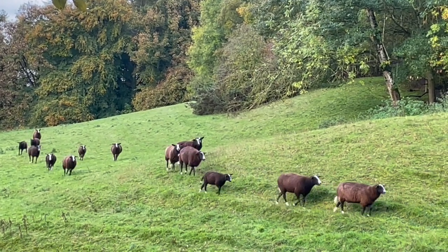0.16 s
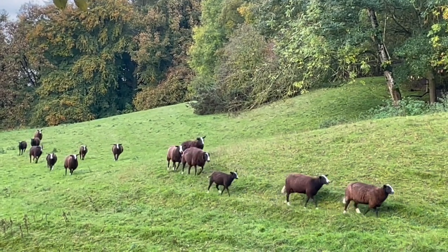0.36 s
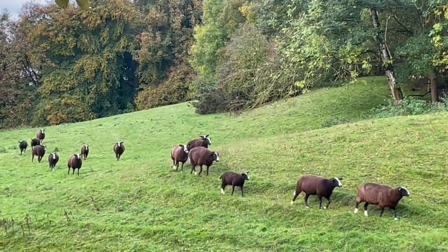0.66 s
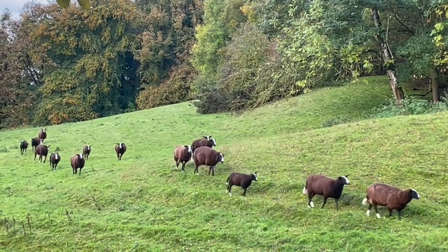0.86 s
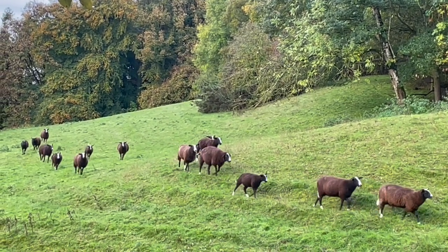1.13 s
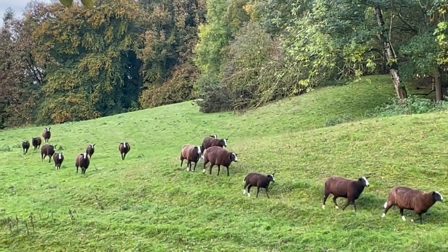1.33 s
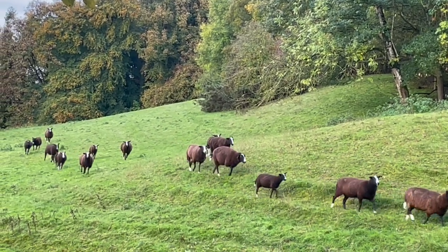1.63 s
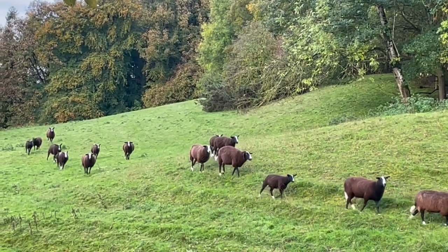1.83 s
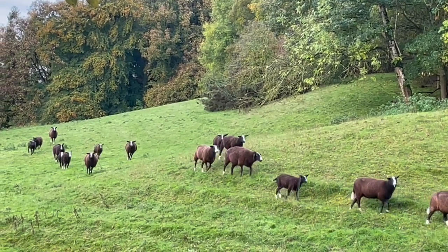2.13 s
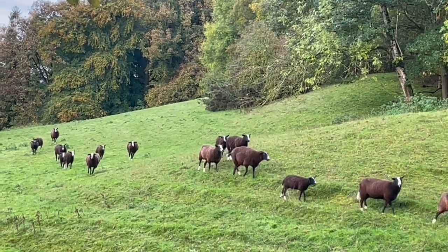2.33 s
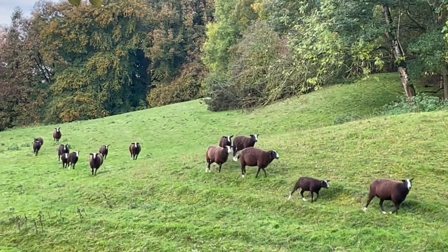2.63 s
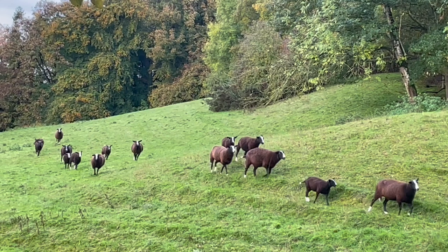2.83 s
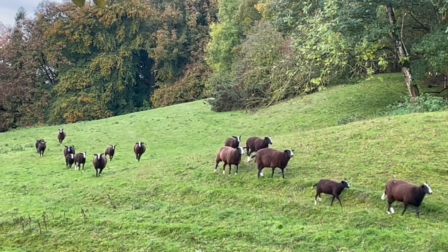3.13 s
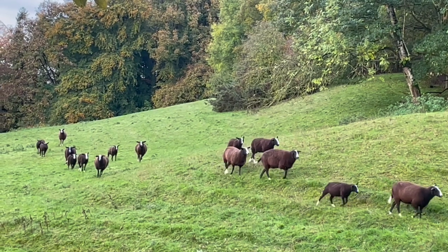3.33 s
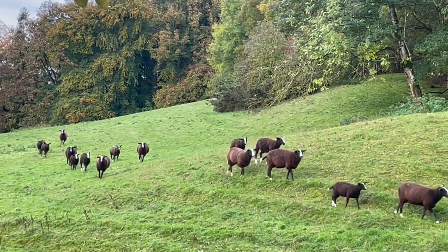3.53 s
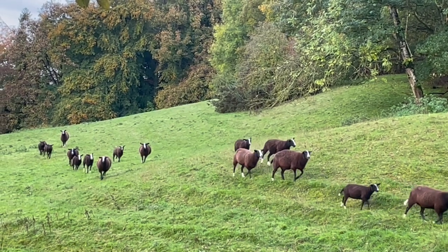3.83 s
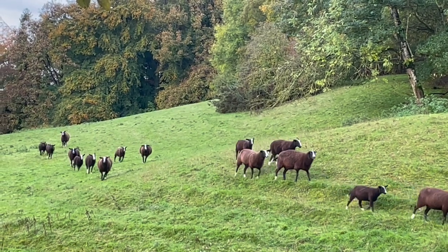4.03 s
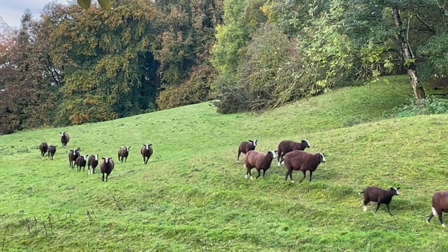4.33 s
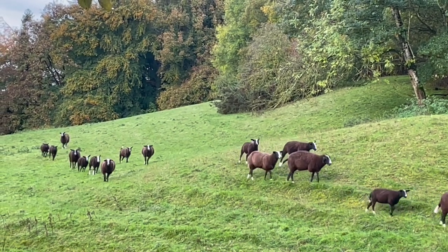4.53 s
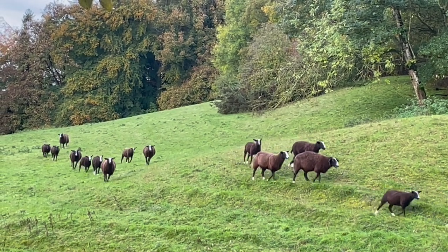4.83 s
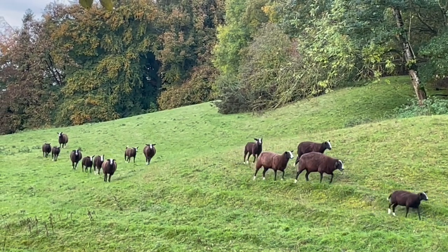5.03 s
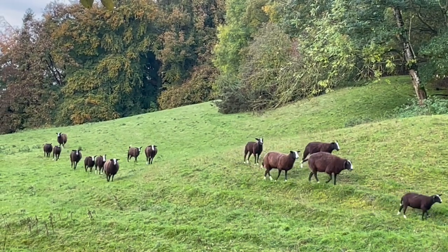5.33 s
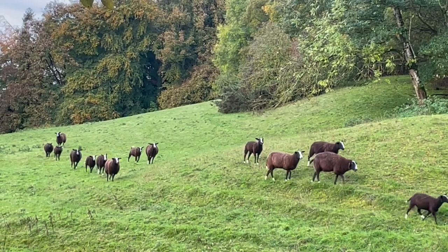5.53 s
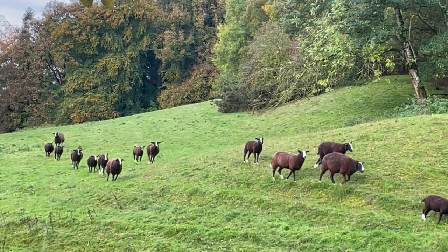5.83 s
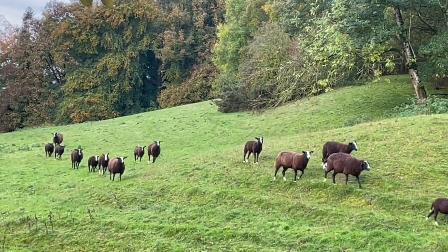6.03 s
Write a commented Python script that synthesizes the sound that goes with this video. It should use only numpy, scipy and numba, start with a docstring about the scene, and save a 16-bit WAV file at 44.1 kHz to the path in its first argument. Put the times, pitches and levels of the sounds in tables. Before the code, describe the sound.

A phone in an open field picks up a flock of sheep with short echoes from ground and trees. After a brief tail of a bleat and weak rough calls, mostly ticks and dull taps fill a gap. Then bleats crowd together: clear, growling, brassy, harsh, low and rising, finishing with a strong trembling one cut off at the end. Low hum, deep rumble and gentle field hiss stay underneath.

```python
"""Sheep bleat one over another on a grass slope, tens of metres from a phone: clean, throbbing, two croaking.
Each voice is a train of vocal-fold slaps and breath that rings in throat resonances, with ground and tree echoes.
Drops tick and tap close by, each a snap and a dying burst of band-passed noise, over a faint patter.
Under all lie a wavering low hum with deep rumble and a soft, flickering field hiss, both shaped noise or tone."""
import sys
import numpy as np
from scipy import signal
from scipy.fft import rfft, irfft, next_fast_len
from scipy.io import wavfile
from scipy.ndimage import uniform_filter1d
from numba import njit

SR = 44100
rng = np.random.default_rng(int(sys.argv[2]) if len(sys.argv) > 2 else 0)


def dump_mix(stems):
    """Bounce the given channels to the path in sys.argv[1] as a 16-bit WAV at rate SR."""
    frames = np.atleast_2d(stems).T  # one column per channel
    limited = np.clip(frames, -1, 1)  # hard clip at full scale
    pcm = np.round(limited * 32767).astype(np.int16)
    wavfile.write(sys.argv[1], SR, pcm)


N = 272097


def undb(db):
    """Amplitude ratio of a level in dB."""
    return 10 ** (np.asarray(db) / 20)


def unit(x):
    """Scale to rms 1."""
    return x / np.sqrt(np.mean(x ** 2))


def on_log(hz, table):
    """Read (Hz, value) rows on a log-frequency axis."""
    at, value = np.transpose(table)
    return np.interp(np.log(np.maximum(hz, 1)), np.log(at), value)


def rows_of(curve, table):
    """The rows of a table that belong to one bleat, without the bleat itself."""
    return [row[1:] for row in table if row[0] is curve]


@njit
def svf(x, hz, width):
    """State-variable band-pass with a moving centre, gain 1 there."""
    y, band, low = np.empty(len(x)), 0., 0.
    for i in range(len(x)):
        g, k = np.tan(np.pi * hz[i] / SR), width / hz[i]
        v = (band + g * (x[i] - low)) / (1 + g * (g + k))
        band, low, y[i] = 2 * v - band, low + 2 * g * v, k * v
    return y


def walk(rate):
    """Random levels held 1 / rate s and smoothed twice over that time; spread near 1."""
    hold = int(SR / rate)
    steps = np.repeat(rng.standard_normal(N // hold + 1), hold)
    return 1.284 * uniform_filter1d(uniform_filter1d(steps, hold), hold)[:N]


# pitch and level through each single bleat: time_s, pitch_hz, level_db
TAIL = [(0, 98.9, -29), (.04, 98.4, -37.5), (.075, 95.5, -42), (.12, 91, -77)]
HOARSE = [(0.12, 129.5, -56), (0.176, 137.6, -45.5), (0.254, 126.9, -44.5), (0.494, 125.4, -44.5),
          (0.62, 122.4, -61)]
CROAK = [(0.33, 62.2, -54), (.37, 61.8, -43), (.42, 59.6, -49), (0.5, 53.9, -44), (.56, 45.8, -48.5),
         (0.62, 40.3, -41)]
FAINT = [(0.44, 179.4, -50.5), (0.6, 194.5, -54), (0.72, 191.4, -54), (0.85, 186, -56), (0.93, 172, -72)]
CLEAR = [(2.24, 197.3, -50), (2.276, 200.1, -50.5), (2.31, 213.6, -43), (2.354, 229.9, -35.5),
         (2.4, 241.8, -36.5), (2.47, 242.5, -38), (2.552, 244.4, -36.5), (2.68, 239.2, -40.5),
         (2.8, 241.4, -42.5), (2.88, 242, -45.5), (2.944, 233.8, -39.5), (2.988, 205, -46.5),
         (3.03, 185, -95)]
GROWL = [(2.26, 46.94, -48.5), (2.322, 46, -37.5), (2.908, 46.34, -36), (2.98, 45.3, -74)]
MURMUR = [(3.04, 174, -63), (3.1, 179.3, -55), (3.2, 187, -50), (3.25, 195, -50.5), (3.3, 205, -49)]
LAMB = [(3.76, 186, -47), (3.86, 172, -62), (3.92, 181.3, -52), (3.994, 199.3, -42), (4.05, 191.6, -50.5),
        (4.1, 185, -82)]
LOW = [(4.74, 115.9, -39), (4.8, 118.5, -34.5), (4.938, 119.6, -33), (5.024, 117.4, -34),
       (5.06, 115, -36.5), (5.228, 111.8, -36.5), (5.336, 110.7, -40), (5.372, 115.4, -35),
       (5.385, 112.8, -91)]
SOFT = [(4.74, 196, -66), (4.76, 197, -47.5), (5.32, 186, -52.5), (5.48, 169, -58.5)]
RISING = [(5.05, 188.5, -46), (5.108, 196.2, -41.5), (5.186, 218.4, -39), (5.23, 223.1, -39.5),
          (5.36, 226.6, -41.5), (5.496, 229, -42), (5.538, 239.2, -43.5), (5.568, 277.6, -54),
          (5.674, 267.3, -49.5), (5.738, 267.6, -60), (5.75, 261.7, -67)]
NEAR = [(5.705, 130.4, -50), (5.722, 137, -35.5), (5.752, 144.7, -28.5), (5.835, 153.1, -29.5),
        (5.96, 153.4, -28.5), (6.06, 154.6, -27), (6.17, 150, -31)]
# bleats with their own treble balance: time_s, pitch_hz, level_db (lower resonances), upper_over_lower_db
DEEP = [(3.235, 119.9, -50, 6), (3.263, 119.4, -43, 11), (3.285, 128, -40, -2), (3.313, 122.5, -42, -1.5),
        (3.347, 133.4, -38, 0), (3.387, 137.4, -34.5, -0.5), (3.433, 145.1, -35.5, 3),
        (3.473, 140.1, -36.5, 1), (3.623, 133.8, -39, 0), (3.647, 128.1, -41.5, -1),
        (3.673, 130.4, -42.5, 4), (3.699, 122.9, -44.5, 0.5), (3.735, 125.2, -63, 14), (3.747, 125, -60, 6),
        (3.77, 122.5, -51, 16)]
LOUD = [(4.268, 169.8, -68, -2), (4.276, 172, -56, 10), (4.3, 177.1, -56, 5.5), (4.342, 179, -89, 6),
        (4.37, 170.6, -40.5, 1.5), (4.396, 167.6, -35.5, 5), (4.424, 175.4, -52, 6),
        (4.454, 161.8, -42.5, -0.5), (4.478, 173, -32.5, 5), (4.502, 165.8, -39, 8), (4.51, 164.7, -40, 4),
        (4.534, 186.4, -35.5, 3), (4.548, 184.8, -32, 0.5), (4.576, 187.1, -34.5, 5),
        (4.606, 202.8, -33.5, 2.5), (4.652, 208.1, -32.5, -3), (4.674, 205, -34, 0), (4.702, 189.8, -35, 1),
        (4.716, 194.7, -39, 5.5), (4.742, 186.0, -31.5, 1.5), (4.764, 200.2, -35.5, 1.5),
        (4.784, 201, -42, 3), (4.802, 206.5, -31, -4.5), (4.826, 197.4, -39.5, 7), (4.842, 193, -35.5, -9),
        (4.87, 180, -42, -14)]
# stretches where a voice turns ragged: bleat, from_s, to_s, added_jitter (share of a period),
# loss_db (above TOP_THROAT_HZ)
RAGGED = [(LOUD, 4.26, 4.52, .022, 3), (LOUD, 4.52, 4.61, .004, 0), (LOUD, 4.61, 4.69, 0, 6),
          (LOUD, 4.69, 4.87, .02, 1), (DEEP, 3.2, 3.34, .03, 13), (DEEP, 3.64, 3.8, .012, 2),
          (CLEAR, 2.2, 2.31, .01, 3)]
# side pockets of the throat swallow a band: bleat, centre_hz, width_hz
HOLLOWS = [(LOUD, 4050, 800), (GROWL, 3500, 1200)]
CATCH_SAG, CATCH_JITTER = .006, .297  # per dB of catch: fall of pitch as a share, growth of jitter
CATCH_EDGE = .34  # flare at both edges of a catch, dB per dB, before the treble weighting
UPPER_HOLD = .17  # share of a fall in level that the upper resonances do not follow


def bleat(curve, catches, jitter, scatter_db, breath_db, treble_share, facing, throat, jaw):
    """Vocal folds slap shut once a cycle, air puffs follow, the throat rings; returns start and sound."""
    s, *columns = np.transpose(curve)
    start = int(max(s[0], 0) * SR)
    t = np.arange(start, min(int(s[-1] * SR), N)) / SR
    hz, db, *bright_db = (np.interp(t, s, column) for column in columns)
    upper_db = bright_db[0] if bright_db else UPPER_HOLD * (db.max() - db)

    catch_db, flare_db = np.zeros((2, len(t)))
    for at_s, depth_db, length_s in catches:
        shut = np.exp(-np.log(2) * ((t - at_s) / (length_s / 2)) ** 4)
        catch_db += depth_db * shut
        flare_db += CATCH_EDGE * depth_db * 4 * shut * (1 - shut)
    more_jitter, loss_db = np.zeros((2, len(t)))
    for a, b, more, loss in rows_of(curve, RAGGED):
        inside = np.interp(t, (a - .01, a, b, b + .01), (0, 1, 1, 0))
        more_jitter += more * inside
        loss_db += loss * inside

    # a catch slows the folds and makes them uneven
    cycles = np.cumsum(hz * (1 - CATCH_SAG * catch_db)) / SR
    whole = np.arange(1, int(cycles[-1]))
    smooth_catch_db = uniform_filter1d(catch_db, size=1500)
    uneven = jitter * (1.5 + CATCH_JITTER * np.interp(whole, cycles, smooth_catch_db))
    uneven = uneven + np.interp(whole, cycles, more_jitter)
    sources = folds(curve, cycles, whole, uneven, scatter_db, breath_db)

    jaw_percent = np.interp(t, np.linspace(s[0], s[-1], 3), jaw)
    caught, steady = ring_throat(curve, t, hz, sources, throat, jaw_percent, catch_db, flare_db, loss_db,
                                 treble_share, facing)
    # lower and upper resonances are levelled apart only where the bleat gives both levels
    norms = steady.std(1) if bright_db else 2 * [np.std(steady[0] + undb(upper_db) * steady[1])]
    voice = caught[0] / norms[0] + undb(upper_db) * caught[1] / max(norms[1], 1e-9)
    for dip_hz, width in rows_of(curve, HOLLOWS):
        voice = voice - svf(voice, np.full(len(t), float(dip_hz)), float(width))

    # fade both ends over 12 ms, except where the scene itself begins or ends
    since_start = t - s[0] + (start == 0)
    until_end = s[-1] - t + (s[-1] > (N - 400) / SR)
    edge = np.clip(np.minimum(since_start, until_end) / .012, 0, 1)
    return start, voice * undb(db) * edge


# folds that close in two steps: bleat, lead (samples), early_share (of the main slap)
EARLY_SLAP = [(DEEP, 62, .5), (GROWL, 430, .6)]
LOUDEST_SLAP = 1.1  # cap on the scatter, in spreads


def folds(curve, cycles, whole, uneven, scatter_db, breath_db):
    """Slaps of the vocal folds plus breath after each one, as heard by the lower and the upper throat."""
    size = len(cycles)
    chance = rng.standard_normal((400, 2))[:len(whole)].T
    at = np.interp(whole + np.clip(uneven * chance[0], -.4, .4), cycles, np.arange(size - 0.))
    # a windowed sinc places each slap between samples
    taps = np.arange(-7, 9)[:, None]
    part = taps - at % 1
    kernel = np.sinc(part) * np.cos(np.pi * part / 17) ** 2
    # the puff is stronger in the treble, so the low harmonics stay clean
    puff = np.exp(-(cycles % 1) / .3) * signal.lfilter([1, -.7], 1, rng.standard_normal(size))
    sources = []
    for share in (.3, 1):  # low resonances feel little of the change from slap to slap
        slaps = np.zeros(size + 16)
        slap_db = share * scatter_db * np.minimum(chance[1], LOUDEST_SLAP)
        np.add.at(slaps, at.astype(int) + taps + 7, kernel * undb(slap_db))
        for lead, early in rows_of(curve, EARLY_SLAP):
            slaps[:-lead] += early * slaps[lead:]
        sources.append(unit(slaps[7:7 + size]) + undb(breath_db) * unit(puff))
    return sources


# the mouth opens as the pitch climbs and lifts the lower resonances: bleat, climb_share (exponent on pitch)
WIDE_MOUTH = [(LOUD, 0.36)]
# one resonance swells or fades as the tongue moves: bleat, time_s, half_length_s, resonance_hz, change_db
SWELLS = [(CLEAR, 2.37, .03, 1900, 10), (CLEAR, 2.36, .03, 3160, 6), (CLEAR, 2.6, .03, 3160, 6),
          (CLEAR, 2.68, .03, 3780, 7), (CLEAR, 2.85, .1, 2780, -4), (LOUD, 4.575, .045, 2950, 4),
          (LOUD, 4.65, .03, 2950, -9), (LOUD, 4.73, .035, 5650, 8), (LOUD, 4.52, .04, 5150, 4),
          (LOUD, 4.59, .05, 2476, 2), (HOARSE, .25, .08, 2080, 3), (LOW, 4.82, .02, 580, 3),
          (LOW, 5.15, .12, 1547, -6), (LOW, 5.1, .2, 2616, -5), (RISING, 5.3, .15, 5030, 4),
          (DEEP, 3.44, .04, 544, 3), (NEAR, 5.728, .02, 4140, 7)]
UPPER_HZ, TOP_THROAT_HZ = 1800, 3200  # upper resonances lie above the first, ragged loss above the second
CATCH_JAW = .54  # rise of the resonances in percent per dB of catch
CATCH_SPAN_HZ = 1300, 3300  # between these the dip shrinks to its treble share
STRIKE_WIDER = 4.37  # a slap reaches each resonance through a wider band, so the ring starts at once
SKIRT_WIDER = 6  # a second, wider band trims the skirts of the upper resonances
WANDER_DB, WANDER_S = 1.1, .045  # each upper resonance swells and fades on its own with tongue and lips


def ring_throat(curve, t, hz, sources, throat, jaw_percent, catch_db, flare_db, loss_db, treble_share, facing):
    """Moving resonances ring at each slap; returns lower and upper sums with the catches and without."""
    caught, steady = np.zeros((2, 2, len(t)))
    shift = 1 + (jaw_percent + CATCH_JAW * catch_db) / 100
    lift = (hz / hz.mean()) ** sum(share for share, in rows_of(curve, WIDE_MOUTH))
    # facing the phone, all bands build up to the same instant and each slap is one sharp upward spike
    way = -1 if facing else 1
    for centre_hz, width, mode_db in throat:
        upper = int(centre_hz > UPPER_HZ)
        centre = centre_hz * shift * (1 if upper else lift)
        knots = np.arange(t[0], t[-1] + WANDER_S, WANDER_S)
        ring_db = upper * WANDER_DB * np.interp(t, knots, rng.standard_normal(64)[:len(knots)])
        for at_s, half_s, near_hz, change_db in rows_of(curve, SWELLS):
            if abs(near_hz / centre_hz - 1) < .07:
                ring_db = ring_db + change_db * np.exp(-((t - at_s) / half_s) ** 2)
        ring_db = mode_db + ring_db - (centre_hz > TOP_THROAT_HZ) * loss_db

        # way = -1 filters backwards in time
        strike = svf(sources[upper][::way].copy(), centre[::way].copy(), STRIKE_WIDER * width)
        strike = -way * strike[::way]
        if upper:  # valleys between the upper resonances stay dark
            strike = svf(strike.copy(), centre, SKIRT_WIDER * width)
        ring = undb(ring_db) * svf(strike.copy(), centre, float(width))
        steady[upper] += ring
        high = np.interp(centre_hz, CATCH_SPAN_HZ, (0, 1))
        caught[upper] += ring * undb((1 - treble_share) * high * (catch_db + high * flare_db) - catch_db)
    return caught, steady


# catches of the throat inside throbbing bleats: time_s, depth_db, length_s
GROWL_CATCHES = [(2.375, 6, 0.047), (2.468, 14, 0.052), (2.581, 15, 0.059), (2.682, 11.5, 0.043),
                 (2.765, 13, .04), (2.849, 16, 0.044), (2.949, 8.5, 0.043)]
NEAR_CATCHES = [(5.723, 12, .04), (5.794, 12.3, 0.025), (5.868, 12.5, 0.024), (5.943, 12.3, 0.022),
                (6.022, 10.1, 0.049), (6.097, 12, .035), (6.172, 11, 0.018)]
# kinds of voice: base jitter (scaled up in bleat), slap scatter_db, breath_db over the slaps,
# share of a catch felt in the treble, facing the phone 0 or 1
CLEAN, VEILED = (.0015, .7, -20, 1, 0), (.002, 2, -9, 1, 0)
HARSH, BRASSY = (.003, 2, -6, 1, 0), (.003, 1.2, -3, 1, 1)
GRITTY, ROUGH = (.011, 3, -1, .25, 1), (.03, 3, 1, 1, 0)
CREAKY, RASPY = (.015, 1.5, 3, 1, 0), (.07, 2.5, 9, 1, 0)
# the flock on the slope: bleat, catches, kind of voice, left_minus_right_db,
# throat resonances (centre_hz, width_hz, level_db)
FLOCK = [ (TAIL, [], RASPY, 0., [(690, 56, 13), (510, 61, 2), (1426, 22, 1), (1620, 420, -3.5),
         (2100, 91, 0.5), (2740, 50, -2.5), (3300, 390, -14.5)]), (HOARSE, [], ROUGH, 0.96, [(500, 87, 1),
         (1260, 78, 0), (2030, 85, -4.5), (2500, 260, -8), (3210, 33, -9)]), (CROAK, [],
         CREAKY, .3, [(2300, 190, 2), (2710, 150, 7.5), (3210, 220, -1.5), (3800, 180, -10),
         (4530, 240, -11)]), (FAINT, [], CLEAN, 0., [(196, 137, -1), (655, 79, 3), (1100, 61, -4),
         (2250, 190, -7.5), (2820, 430, -8.5)]), (CLEAR, [], CLEAN, 0.45, [(230, 220, -19), (754, 79, 6),
         (1237, 100, -11), (1550, 300, -5.5), (1840, 140, -12), (2760, 125, -0.5), (3190, 290, -8),
         (3700, 170, -11), (4700, 160, -15.5), (5680, 190, -15), (10200, 850, -29.5)]),
         (GROWL, GROWL_CATCHES, RASPY, 0.62, [(638, 71, 0), (1555, 85, 1.5), (2040, 25, -2),
         (2400, 350, -6), (3160, 260, -33), (5000, 1300, -27)]), (MURMUR, [], ROUGH, 0., [(186, 77, -0.5),
         (516, 73, -2), (1265, 83, -1.5), (2100, 314, -1)]), (DEEP, [], BRASSY, 0.37, [(129.9, 16, -15.5),
         (398, 55, -11), (529, 79, 0), (980, 330, -37), (1248, 133, -4.5), (1953, 138, 6), (2340, 120, 6),
         (2750, 310, -8), (3410, 163, -4.5), (4140, 1600, -23)]), (LAMB, [], VEILED, 0.78, [(411, 58, 5.5),
         (702, 25, 16), (1720, 400, 4), (2740, 150, 11.5), (3330, 310, 8), (4000, 300, -2)]), (LOUD, [],
         HARSH, .1, [(185, 230, -0.5), (418, 32, 9.5), (660, 85, 15.5), (1120, 420, 1.5), (1394, 65, 5),
         (2000, 170, 6.5), (2506, 425, 9.5), (2917, 120, 7.5), (3450, 350, 1), (5150, 150, -7.5),
         (5700, 120, -7)]), (LOW, [], VEILED, -0.11, [(115, 33.3, -4.5), (573.6, 49, 12.5), (1330, 250, 0),
         (1533, 59, 6.5), (1800, 210, 0), (2650, 81, 2), (3220, 320, -16)]), (SOFT, [],
         CLEAN, 0., [(362.6, 20, -16), (734, 330, -28.5)]), (RISING, [], CLEAN, 0., [(557.3, 56, 13),
         (608, 128, 18.5), (1573, 102, 16.5), (3106, 86, 20), (4200, 1500, 0), (5005, 140, 4),
         (5650, 140, 3)]), (NEAR, NEAR_CATCHES, GRITTY, 1.9, [(150, 55, -6), (398, 107, -0.5),
         (657, 27, 10), (910, 92, -0.5), (1248, 107, 7), (1530, 200, -1.5), (2120, 106, 9.5),
         (2430, 360, 2), (3200, 350, -4), (3678, 210, -4), (4040, 310, -6.5), (5360, 330, -15.5),
         (7230, 1940, -25), (9900, 640, -59)]), ]
# the jaw moves the resonances, in flock order: start_percent, middle_percent, end_percent
JAW = [(-0.5, -2.5, 25), (-3, 8.5, 10), (-5.5, 5.5, -6), (-12, -0.5, -5), (-2, -0.5, 1), (-1, 6, 1),
       (1, 5.5, 4), (5, 8.5, 11.5), (-8, -1, 8), (0, 1.5, 0), (3, 6.5, 3), (4, 10.5, -3), (3.5, 6, 0),
       (-0.5, -1.5, -3)]


def flock():
    """Every bleat at its time and side, then the echoes of ground and trees."""
    out = np.zeros((2, N))
    for (curve, catches, kind, pan_db, throat), jaw in zip(FLOCK, JAW):
        start, voice = bleat(curve, catches, *kind, throat, jaw)
        out[:, start:start + len(voice)] += voice * undb([[pan_db / 2], [-pan_db / 2]])
    return out + echoes(out)


# returns from the ground (first row) and tree line: delay_s, level_db
ECHOES = [(.006, -18), (.031, -18), (.058, -13.5), (.097, -62), (.15, -20.5)]
ECHO_LEFT_DB = 5.5  # the slope throws the ground echo more to one side


def echoes(direct):
    """Delayed, dulled copies; tree echoes swap sides and every second echo flips the right side."""
    dull = signal.lfilter([.5], [1, -.5], direct)
    out = np.zeros((2, N))
    for k, (delay, db) in enumerate(ECHOES):
        lag = int(delay * SR)
        back = (dull[::-1] if k else dull)[:, :-lag]
        left_gain = undb(ECHO_LEFT_DB * (k == 0))
        out[:, lag:] += undb(db) * back * [[left_gain], [(-1) ** k]]
    return out


def drops(table, t60, spread):
    """Each drop is a snap and a dying burst of noise around its centre; spread = band width over centre."""
    out, t = np.zeros(N + 4096), np.arange(4096) / SR
    for s, db, hz in table:
        push = rng.standard_normal(4096) * undb(-60 * t / max(t60, .003))
        push[0] += 5.5
        burst = svf(push, np.full(4096, float(hz)), spread * hz)
        at = int(s * SR)
        out[at:at + 4096] += undb(db) * burst / np.abs(burst).max()
    return out[:N]


# sharp bright drops close by: start_s, low_peak_db, high_peak_db (one for each of the two bands)
TICKS = [(0.2348, -40.5, -41), (0.397, -42, -64), (0.932, -40, -57), (1.1313, -31, -67), (1.3467, -34, -61),
         (1.792, -34.5, -59), (2.552, -34.5, -63), (2.7145, -39, -27), (2.7989, -57.5, -40),
         (2.8696, -38, -62), (3.029, -55, -50), (3.089, -66, -47), (3.25, -55, -55), (3.3154, -46, -45),
         (3.332, -42, -41), (3.5981, -35, -56), (3.993, -35, -32), (4.834, -30.5, -49), (4.863, -46, -32.5),
         (4.9903, -33, -32), (5.1433, -35, -24), (5.1864, -31, -56), (5.2902, -33, -28.5),
         (5.3594, -50, -40), (5.4323, -27, -37), (5.501, -59, -52), (5.5703, -30, -29), (6.1558, -30, -35)]
TICK_BANDS_HZ, TICK_T60_S = (5500, 11500), .03


def ticks():
    """Bright drops sound in two bands at once."""
    s, *levels = np.transpose(TICKS)
    bands = zip(levels, TICK_BANDS_HZ)
    return sum(drops(zip(s, db, 0 * s + hz), TICK_T60_S, spread=.7) for db, hz in bands)


# duller drops close by: start_s, peak_db, centre_hz
TAPS = [(.597, -36, 2577), (.764, -38.5, 2500), (.972, -40, 4000), (1.131, -31, 780), (1.327, -44, 1400),
        (1.347, -34, 2520), (1.532, -40.5, 2000), (1.629, -30, 2250), (1.721, -35, 2300),
        (1.79, -34.5, 2139), (1.87, -40, 1834), (1.93, -44, 2000), (3.155, -38, 1330), (3.258, -41, 2600),
        (3.745, -37, 1100), (3.996, -40, 3100), (4.165, -42, 200.3), (4.188, -39, 2100),
        (4.283, -36.5, 150), (4.3, -33, 140), (4.385, -33.5, 150), (5.36, -31, 2000), (5.502, -28, 2740),
        (5.57, -32, 2620), (5.63, -33, 1070), (5.66, -34, 174), (5.67, -38, 2500)]


def dull_taps():
    """Duller drops sound in one band each, with a longer fall of the noise."""
    return drops(TAPS, t60=.077, spread=.7)


PATTER_PER_S, PATTER_T60_S = 30, .0064
PATTER_DB, PATTER_SPREAD_DB = -60, 2.5  # faintest peak, and scale of the spread above it


def patter():
    """Many faint drops at random moments, a few of them louder."""
    u = rng.random((int(PATTER_PER_S * N / SR), 3))
    db = PATTER_DB - PATTER_SPREAD_DB * np.log(1 - .97 * u[:, 1])
    centre_hz = 1500 * 6 ** u[:, 2]
    return drops(zip(u[:, 0] * N / SR, db, centre_hz), PATTER_T60_S, spread=.72)


def noise_band(centre, width):
    """Noise passed twice through one band, at rms 1."""
    return unit(svf(svf(rng.standard_normal(N), centre, width), centre, width))


# low hum under the flock: time_s, pitch_hz, level_db
HUM = [(0, 82.5, -42.5), (.57, 81.66, -45), (1.0, 77.5, -45.5), (1.34, 72, -53.5), (1.55, 73.54, -43),
       (2.1, 73.2, -47.5), (2.6, 66, -52), (2.97, 76.33, -48.5), (3.56, 75.06, -48.5), (3.7, 63.5, -51),
       (4.07, 77.57, -48.5), (4.93, 78.33, -49.5), (5.6, 75.66, -48.5), (5.88, 82.6, -49),
       (6.17, 76.4, -57)]
HUM_WAVER_DB, HUM_WAVER_PER_S = .5, 21


def hum():
    """A low tone that wavers in pitch and strength, with a haze of noise round it."""
    t = np.arange(N) / SR
    s, *columns = np.transpose(HUM)
    hz, db = (np.interp(t, s, column) for column in columns)
    hz = hz * (1 + .0218 * walk(18))
    tone = np.sqrt(2) * np.sin(2 * np.pi * np.cumsum(hz) / SR)
    haze = noise_band(hz, 33.)
    level = undb(db + HUM_WAVER_DB * walk(HUM_WAVER_PER_S))
    return level * (undb(-1.) * tone + undb(-4) * haze)


# deep noise that swells slowly: time_s, level_db (near 130 Hz), level_db (near 45 Hz)
RUMBLE = [(0.0, -52, -74), (2.08, -67.5, -60), (2.51, -54.5, -67), (3.93, -52.5, -57), (5.27, -55.5, -53),
          (5.699, -53.5, -59), (6.17, -53, -49)]


def rumble():
    """Two bands of deep noise, above and below the hum, each with its own slow level."""
    t = np.arange(N) / SR
    s, *levels = np.transpose(RUMBLE)
    bands = zip(levels, (130., 45.), (70., 25.))  # centre Hz, width Hz
    return sum(undb(np.interp(t, s, db)) * noise_band(np.full(N, hz), width) for db, hz, width in bands)


# colour of the field hiss: frequency_hz, density_db (per Hz, relative)
FIELD = [(25, -25), (50, 20), (90, 18), (130, 8), (200, -1.5), (300, -2), (600, -1), (1200, -7),
         (2500, -6.5), (4000, -7), (6500, -10), (10000, -17), (13300, -21), (14000, -27), (14600, -66)]
# breadth of the field hiss: frequency_hz, side_over_mid (amplitude ratio)
FIELD_WIDE = [(60, 0.053), (200, 0.36), (600, 0.43), (1500, 0.81), (2400, 0.21), (3700, 0.0057),
              (6500, 0.059), (9000, 1)]
FIELD_DB, FLICKER_DB = -50.5, 1.2  # level of the whole hiss, flicker of each band


def field():
    """Overlapping bands of stereo noise, half an octave apart, that flicker each on its own."""
    out = 0
    size = next_fast_len(N + 1, True) // 2 * 2
    hz = np.fft.rfftfreq(size, 1 / SR)
    shape, wide = undb(on_log(hz, FIELD)), on_log(hz, FIELD_WIDE)
    mid, side = rfft(rng.standard_normal((2, size))) * shape
    sides = np.array([mid + wide * side, mid - wide * side])
    for centre in np.arange(4.5, 14.5, .5):  # log2 of Hz
        band = np.clip(1 - 2 * np.abs(np.log2(np.maximum(hz, 1)) - centre), 0, 1)
        pair = irfft(band * sides, size)[:, :N]
        out = out + undb(FLICKER_DB * walk(9.9)) * pair
    return undb(FIELD_DB) * unit(out)


def scene():
    """The flock over close drops, hum, rumble and field hiss."""
    return flock() + ticks() + dull_taps() + patter() + hum() + rumble() + field()


# phase between the two microphone ports: frequency_hz, left_lead_rad
PORTS = [(300, .05), (780, .1), (1210, -.7), (1680, -1.), (1930, .1), (3880, .1), (6500, -.35),
         (8500, -1.9), (15000, -1.9)]
MIC_BASS_HZ, TOP_HZ = 43, 16400  # the microphone falls away below the first; the top is cut at the second
DIP_HZ, DIP_WIDTH_HZ, DIP_SHARE = 8300, 1500, .97  # a dark band in the treble; share of amplitude lost


def record(dry):
    """Two ports shift the phase between the sides; deep bass falls away, a band near 8 kHz is dark, the top is cut."""
    size = next_fast_len(N + 4096)
    hz = np.fft.rfftfreq(size, 1 / SR)
    dip = 1 - DIP_SHARE * np.exp(-((hz - DIP_HZ) / (DIP_WIDTH_HZ / 2)) ** 4)
    bass = 1 / np.sqrt(1 + (MIC_BASS_HZ / np.maximum(hz, 1)) ** 4)
    turn = np.exp(.5j * on_log(hz, PORTS) * np.array([[1], [-1]]))
    wet = irfft(rfft(dry, size) * dip * bass * turn, size)[:, :N]
    return signal.sosfilt(signal.ellip(10, .2, 70, TOP_HZ, fs=SR, output="sos"), wet)


dry = scene()
out = record(dry)
dump_mix(out)
```